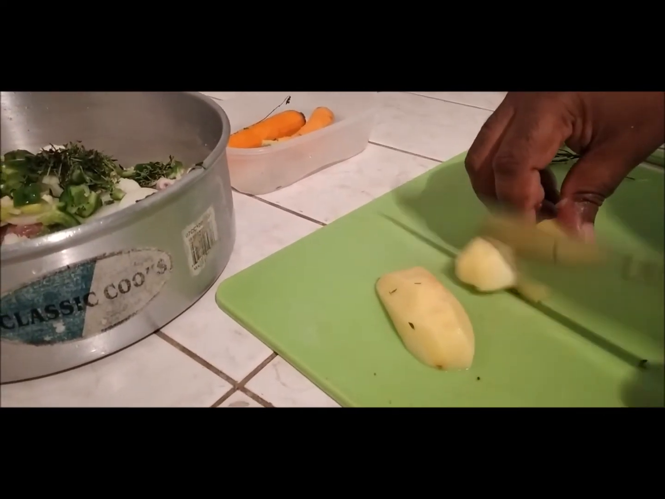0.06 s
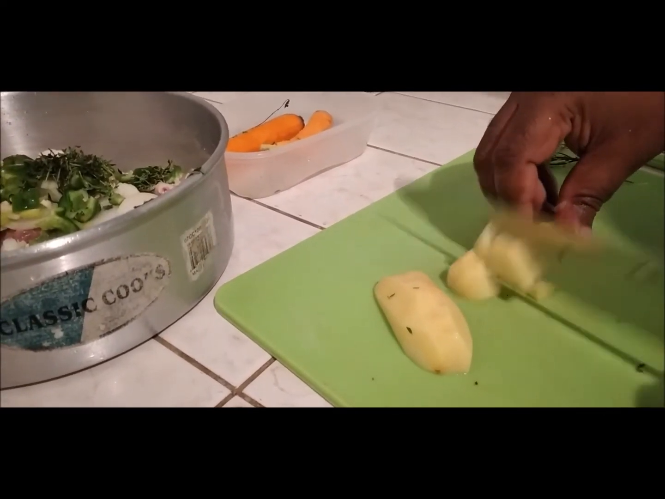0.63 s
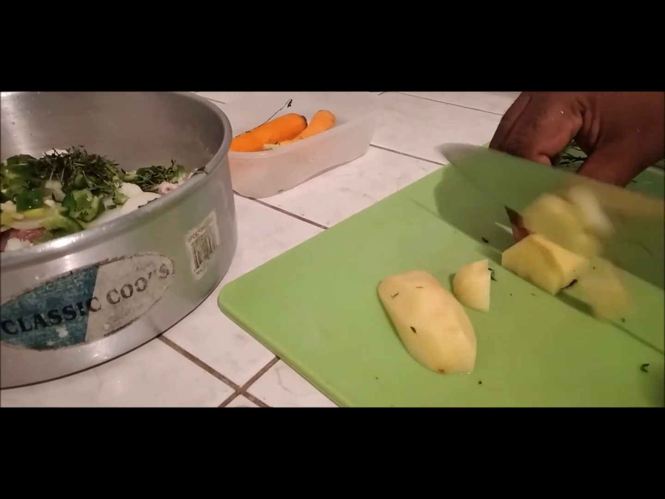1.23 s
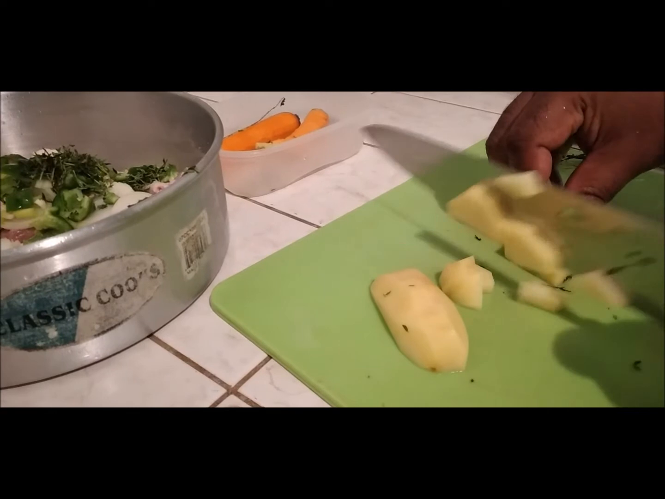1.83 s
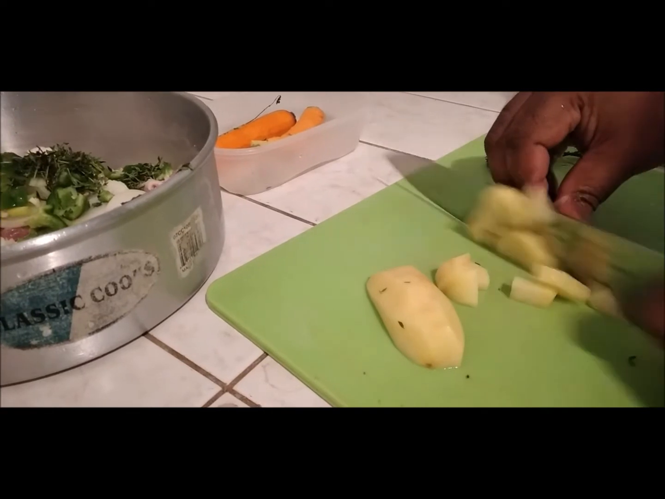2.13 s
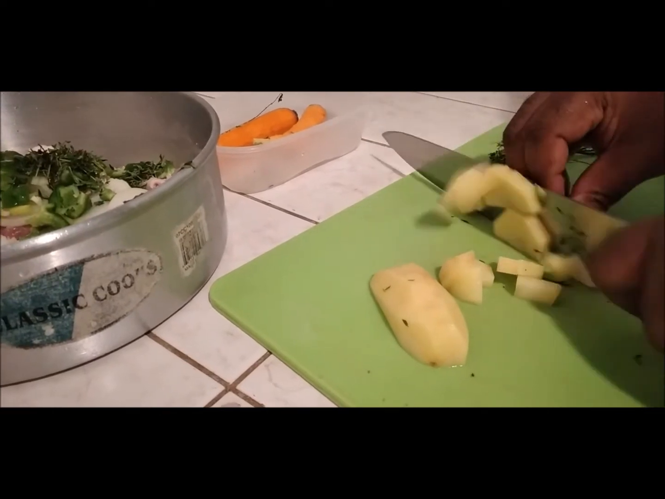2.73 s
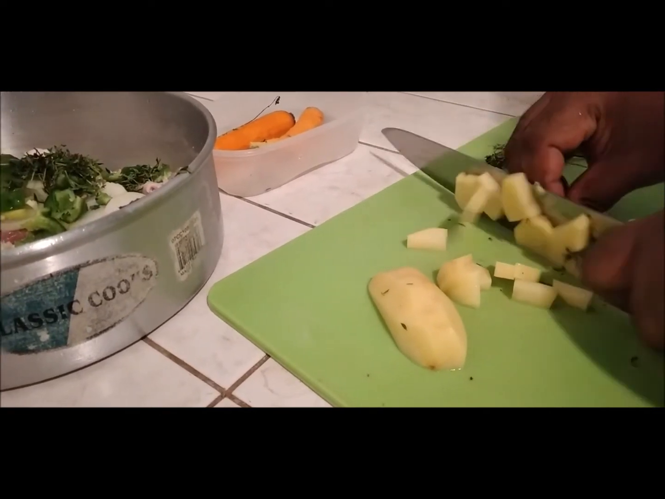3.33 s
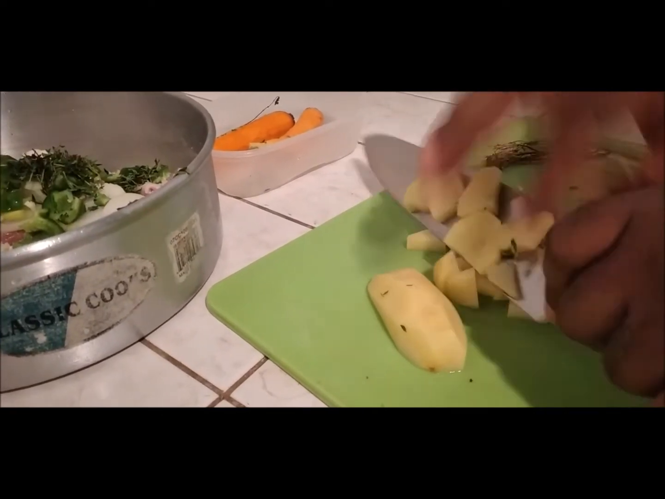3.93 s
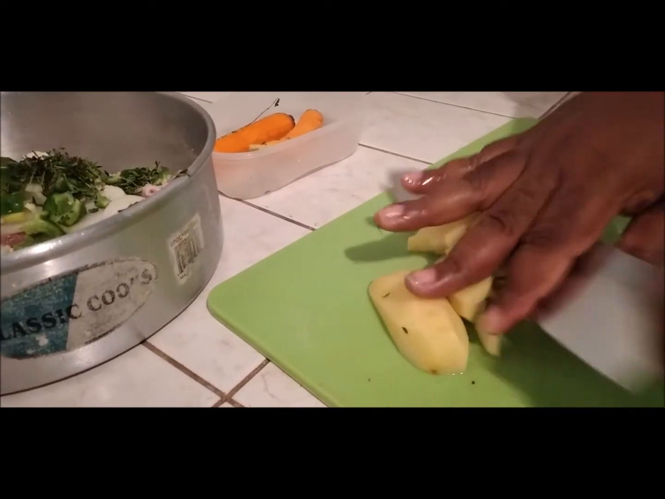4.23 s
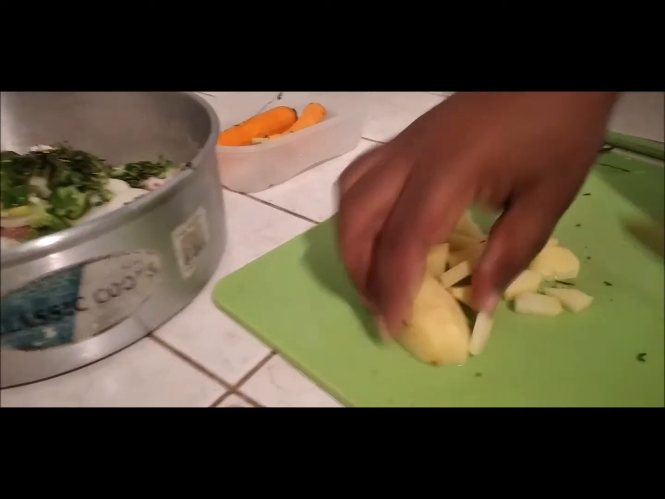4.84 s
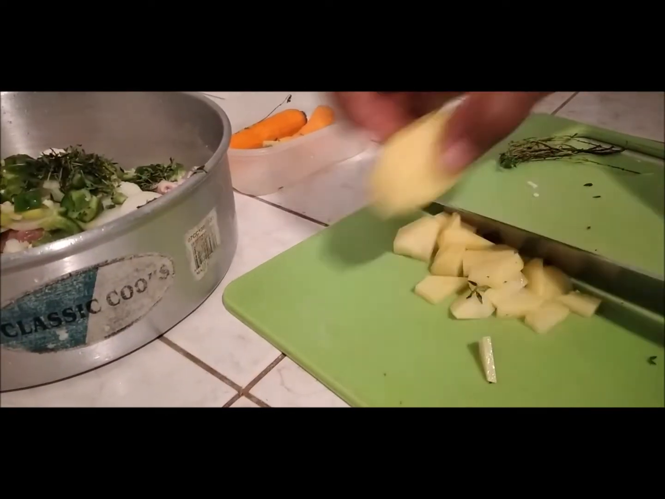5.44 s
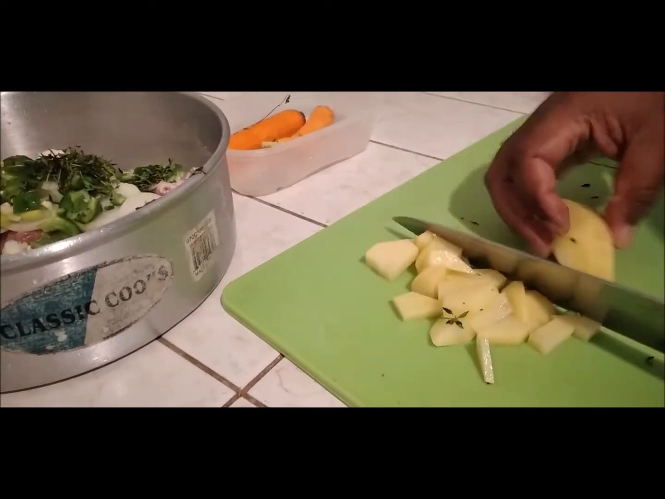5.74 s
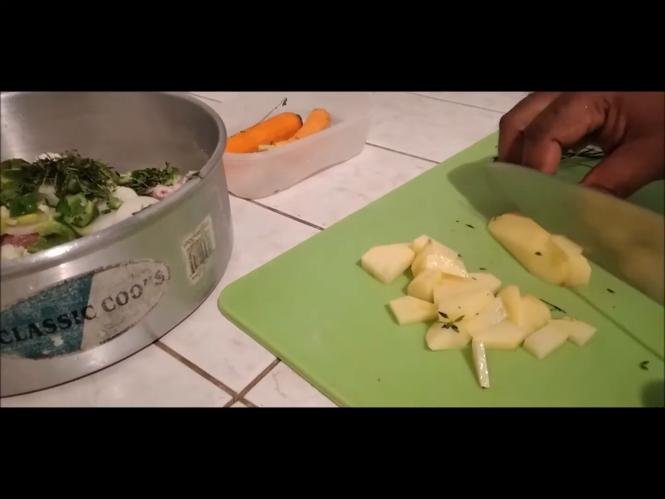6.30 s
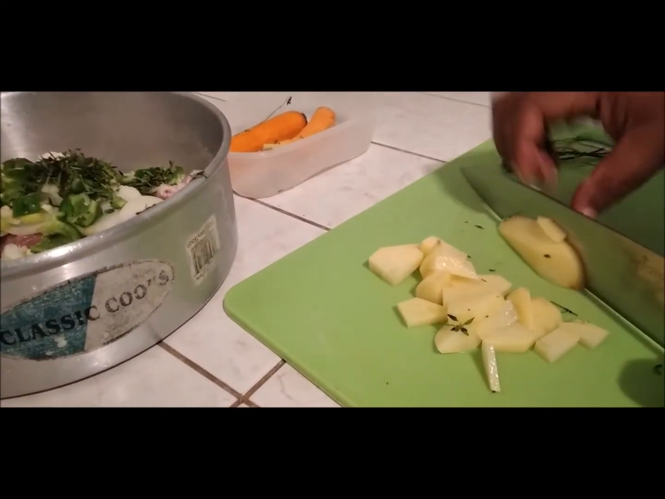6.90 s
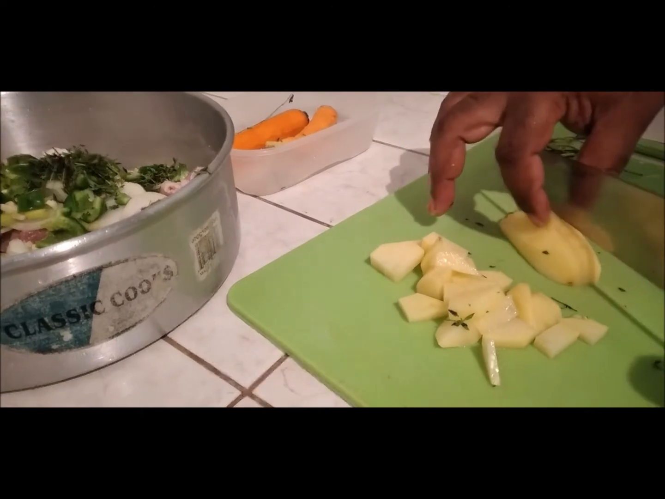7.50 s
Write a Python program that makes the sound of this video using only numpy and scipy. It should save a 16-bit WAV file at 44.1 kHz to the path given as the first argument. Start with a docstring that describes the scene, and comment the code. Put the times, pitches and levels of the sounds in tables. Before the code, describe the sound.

Close by in a small kitchen, a knife crunches through raw potato and knocks on a plastic board seven times at an unhurried pace. A quieter stretch follows, with light taps, tumbling pieces and potato wiped faintly off the blade. A single sharp chop ends the work. Soft room air and a low rumble lie underneath, and a faint distant drone fades early on.

```python
"""A kitchen knife dices a peeled potato on a plastic board on a tiled counter.
Seven strokes come first: each crunches through the flesh, knocks on the board and rings the kitchen.
Light touches fall between them; from 2.1 s a distant drone sinks. After 3.4 s blade and pieces
tap the board and wet potato is wiped off the steel. A last stroke lands at 6.8 s.
Room air and a low rumble run throughout."""
import sys
import numpy as np
from scipy import signal
from scipy.fft import rfft, irfft, next_fast_len
from scipy.io import wavfile

SR = 44100
rng = np.random.default_rng(int(sys.argv[2]) if len(sys.argv) > 2 else 0)


def file_out(sig):
    """Save sig as 16-bit WAV at sys.argv[1]."""
    # one column per channel
    cols = np.atleast_2d(sig).T
    # limit, then scale
    lim = np.clip(cols, -1, 1)
    pcm = np.round(lim * 32767).astype(np.int16)
    wavfile.write(sys.argv[1], SR, pcm)


N = 333396
LEAD = SR // 10   # the first stroke lands just before time zero
TOTAL = N + LEAD
BLOW_S = 0.12

# knife strokes: land_s, level_db, knock_hz, thud_db, clack_db, crack_db, heel_db, cut_s, crunch_db
STROKES = [(-0.024, -11, 933, 2, -7, 0, -16, 0.079, -42),
           (0.4887, -12, 880, 1.5, 0.5, 3.5, -15.5, 0.085, -49.5),
           (0.9831, -9.5, 877, -6, -3.5, -0.5, -18.5, 0.092, -51.5),
           (1.4988, -18.5, 684, 4, 3, 4.5, -8.5, 0.12, -49.5),
           (2.162, -7.5, 1090, 2.5, 3.5, 6.5, -6.5, 0.079, -49),
           (2.6873, -5.5, 1042, -6.5, -2, 3, -18.5, 0.12, -48.5),
           (3.3454, -7, 1023, -2.5, 2.5, -1.5, -14, 0.17, -50),
           (6.7968, -11.5, 1070, 5.5, 1, -1.5, -16, 0.095, -48)]
# board modes, damped by the counter: pitch_hz, level_db, t60_s
BOARD_MODES = [(176, -44.5, 0.035), (275, -29.5, 0.016), (358.4, -31, 0.042), (380, -38, 0.012),
               (475, -24, 0.021), (626, -31, 0.017), (780, -28, 0.084), (894, -20, 0.023),
               (932, -20.5, 0.039), (1160, -21, 0.085), (1226, -26, 0.035), (1324, -15.5, 0.029),
               (1410, -23.5, .018), (1930, -21.5, 0.034), (1806, -21, .012), (2330, -31, 0.015)]
# edge cracking into plastic: freq_hz, density_db
CRACK_SPECTRUM = [(1200, -16), (2400, 3), (3000, 1.5), (4500, -2.5), (6500, -2.5), (7800, 2), (9800, -14.5),
                  (12000, -19), (15500, -47)]
# bursting cells, carried by the board: freq_hz, density_db
CRUNCH_SPECTRUM = [(120, -26.5), (400, -13.5), (620, -9), (850, 1.5), (1100, 1.5), (1400, -3.5),
                   (1700, -10), (2300, -13), (3000, -33), (6000, -51.5)]
# juice: freq_hz, density_db
FIZZ_SPECTRUM = [(1500, -12.5), (3000, 4), (4500, -1.5), (6500, -3), (8300, 4), (10000, -10), (12500, -13),
                 (15500, -29.5)]
# touches of blade, fingers and pieces: start_s, level_db, thud_db, crack_db
LIGHT_TOUCHES = [(0.953, -41.5, 10.5, -36), (1.293, -48, -1, -21), (1.327, -46, 13, 6.5),
                 (1.392, -41, 12, 2), (1.454, -41, -6, -5), (1.482, -33.5, -2, -11),
                 (1.858, -46.5, -7, -20), (2.574, -37.5, 17, 3), (2.867, -35.5, -8, -23),
                 (2.908, -39.5, 9, -29), (3.569, -34.5, -1, 2), (3.737, -43.5, 3, -27),
                 (4.324, -37.5, -3, -29), (4.628, -39.5, 5, -21), (4.962, -44, 16.5, -16),
                 (5.250, -44, 6, 5.5), (5.457, -46.5, 16.5, -29), (5.608, -46, 7, -11),
                 (5.752, -50, 16.5, -14), (5.994, -37, 18, -8.5)]
# pieces being handled: start_s, end_s
HANDLING_SPANS = [(1.95, 2.08), (4.87, 5.02), (5.66, 5.95)]
# wet potato sliding on steel: start_s, end_s, level_db
WIPE_SPANS = [(3.553, 3.57, -50), (5.359, 5.526, -59.5), (5.561, 5.648, -57.5)]
# its swish: freq_hz, density_db
WIPE_SPECTRUM = [(200, 1), (550, -4), (1000, 13), (1600, -0.5), (2400, 4), (3200, -12), (4500, -14.5),
                 (6500, -22.5), (8500, -14), (10000, -28), (13000, -27), (15500, -44)]
# wall reflections: left_delay_s, right_delay_s, level_db
WALL_ECHOES = [(.0046, 0.011, -9), (.0093, 0.014, -15.5), (0.0495, .0515, -24.5)]
# standing waves between the walls: pitch_hz, gain_db
ROOM_MODES = [(116, 4.5), (178.5, 18.5), (268, 3.5), (358, 5.5), (417, 10), (468, 6), (651, 2), (742, 0),
              (823, 3.5), (896, 1), (975, 1), (1128, -3)]
# reverberation time: freq_hz, t60_s
ROOM_DECAY = [(100, 0.65), (260, 0.61), (500, 0.43), (1000, 0.41), (2000, 0.4), (5000, 0.29), (12000, 0.19)]
# reverberation strength: freq_hz, gain_db
ROOM_SPECTRUM = [(60, -2.5), (130, -1.5), (260, -2), (420, 4), (620, -2.5), (950, -3.5), (1500, -2.5),
                 (2300, 0.5), (4000, -4), (8000, -6), (14000, -10.5)]
# likeness of both ears in diffuse sound: freq_hz, correlation
EAR_CORRELATION = [(60, 0.97), (170, 0.76), (330, 0.81), (700, 0.2), (1200, -0.22), (2200, -.05),
                   (8000, 0.9)]
# room air: freq_hz, density_db
AIR_SPECTRUM = [(40, -8.5), (90, -1), (130, -3), (180, -5.5), (250, -4.5), (310, -2.5), (380, -10.5),
                (480, -6), (620, -11.5), (800, -7.5), (1050, -12), (2250, -18), (2750, -27), (3400, -55)]
# low rumble: freq_hz, density_db
RUMBLE_SPECTRUM = [(22, -24.5), (34, -9), (43, 12), (56, 11.5), (64, 0), (74, -18.5), (110, -64.5)]
# distant drone: freq_hz, density_db
DRONE_SPECTRUM = [(80, -23), (115, -4), (220, -5), (268, 7), (295, -2.5), (330, -13.5), (700, -11.5),
                  (1200, -18.5), (2500, -63)]
# microphone port resonances, left then right: centre_hz, width_hz, gain_db
MIC_PORTS = [(6160, 3500, 2), (11800, 3100, 1.5)]


def chops(paths, usual_t60_s=0.009, usual_heel_s=0.005, counter_hz=104, counter_t60_s=0.16):
    """The edge lands tip first, then heel, and the counter booms; each spot stirs the room anew."""
    out = np.zeros((2, TOTAL))
    t = seconds(BLOW_S)
    usual_db, usual_heel_db = np.mean([(row[1], row[6]) for row in STROKES], axis=0)
    for land_s, level_db, knock_hz, thud_db, clack_db, crack_db, heel_db, _, _ in STROKES:
        # a harder blow rings longer; a flatter blade brings the heel harder and sooner
        t60_s = usual_t60_s * from_db(level_db - usual_db) ** 0.22
        heel_s = usual_heel_s / from_db(heel_db - usual_heel_db) ** 0.45
        tip = blow(knock_hz, t60_s, thud_db, clack_db, crack_db, contact_hz=1670, order=2)
        heel = from_db(heel_db) * np.interp(t - heel_s, t, tip, left=0)
        boom_db = -40.5 + 1.1 * thud_db - 60 * t / counter_t60_s
        boom = from_db(boom_db) * np.sin(2 * np.pi * counter_hz * t)
        add(out, land_s, from_db(level_db) * kitchen(tip + heel + boom + squelch(), paths))
    return out


def blow(knock_hz, knock_t60_s, thud_db, clack_db, crack_db, contact_hz, order,
         thud_below_hz=550, clack_above_hz=1250, spread_db=5.5, detune=0.008, crack_t60_s=0.0099):
    """One contact: the struck spot knocks, the board's modes ring, the plastic cracks."""
    t = seconds(BLOW_S)
    body = ring(t, knock_hz, knock_t60_s)
    for hz, db, t60_s in BOARD_MODES:
        strength, shift = rng.standard_normal(2)
        # blade place and angle weight the low and high modes
        weight_db = thud_db * (hz < thud_below_hz) + clack_db * (hz > clack_above_hz)
        body += from_db(db + weight_db + spread_db * strength) * ring(t, hz * (1 + detune * shift), t60_s)
    crack = coloured(rng.standard_normal(len(t)), CRACK_SPECTRUM)
    crack *= from_db(-30 + crack_db - 60 * t / crack_t60_s)
    softness = signal.butter(order, contact_hz, fs=SR, output="sos")   # a longer contact loses its top
    return crack - signal.sosfilt(softness, body)


def slices(bursts_per_s=3000, spread_db=1.5, entry_share=0.43, release_s=0.0044,
           swell_db=4.5, fizz_db=-19.5, juice_swell_db=10):
    """Cells burst under the blade until it lands: a crunch and a wet fizz, both growing with depth."""
    crunch_gain, fizz_gain = np.zeros((2, TOTAL))
    for land_s, *_, cut_s, crunch_db in STROKES:
        t = seconds(cut_s)
        depth = t / t[-1]
        fade = np.clip(np.minimum(depth / entry_share, (t[-1] - t) / release_s + 0.5), 0, 1)
        stroke = fade * from_db(crunch_db + swell_db * (depth - 1))
        add(crunch_gain, land_s - cut_s, stroke)
        add(fizz_gain, land_s - cut_s, stroke * from_db(fizz_db + juice_swell_db * (depth - 0.5)))
    sizes = from_db(spread_db * np.minimum(rng.exponential(1, TOTAL), 4))
    signs = rng.choice([-1, 1], TOTAL)
    bursts = sizes * signs * (rng.random(TOTAL) < bursts_per_s / SR)
    return crunch_gain * coloured(bursts, CRUNCH_SPECTRUM) + fizz_gain * coloured(bursts, FIZZ_SPECTRUM)


def squelch(level_db=-56, t60_s=0.53):
    """Juice hisses briefly as the slice parts from the blade."""
    t = seconds(BLOW_S)
    return coloured(rng.standard_normal(len(t)), FIZZ_SPECTRUM) * from_db(level_db - 60 * t / t60_s)


def touches(usual_contact_hz=1860, settle_s=0.0051, settle_db=-7, pitch_spread=0.029):
    """Soft contacts at changing spots of the board; each lands, then settles."""
    out = np.zeros(TOTAL)
    for start_s, level_db, thud_db, crack_db in LIGHT_TOUCHES + nudges():
        contact_hz = usual_contact_hz * from_db(crack_db) ** 0.13   # harder is shorter and brighter
        for delay_s, gain_db in [(0, 0), (settle_s * rng.uniform(0.46, 1.3), settle_db)]:
            pitch_ratio = np.exp(pitch_spread * rng.standard_normal())
            tap = blow(knock_hz=780 * pitch_ratio, knock_t60_s=0.021, thud_db=thud_db, clack_db=-1.5,
                       crack_db=crack_db, contact_hz=contact_hz, order=4)
            add(out, start_s + delay_s, from_db(level_db + gain_db) * tap)
    return out


def nudges(rate_per_s=29, mean_db=-58, spread_db=2, thud_db=14, crack_db=-6):
    """Handled pieces tumble at uneven moments; rows as in LIGHT_TOUCHES."""
    rows = []
    for start_s, end_s in HANDLING_SPANS:
        for slot_s in np.arange(start_s, end_s, 1 / rate_per_s):
            nudge_s = slot_s + rng.random() / rate_per_s
            rows.append((nudge_s, mean_db + spread_db * rng.standard_normal(), thud_db, crack_db))
    return rows


def wipes():
    """Pieces slide along the wet blade; the swish swells and fades."""
    gain = np.zeros(TOTAL)
    for start_s, end_s, level_db in WIPE_SPANS:
        arch = np.sin(np.linspace(0, np.pi, int((end_s - start_s) * SR)))
        add(gain, start_s, from_db(level_db) * arch)
    return gain * coloured(rng.standard_normal(TOTAL), WIPE_SPECTRUM)


def kitchen(x, paths, scatter_db=-5.5, scatter_t60_s=0.06):
    """Sound arrives by the fixed paths, as early scatter off pot and tiles, and as a diffuse tail."""
    t = seconds(1)
    envelope = from_db(-60 * t / scatter_t60_s) * np.clip((t - 0.002) / 0.001, 0, 1)
    scatter = from_db(scatter_db) * diffuse(len(t)) * envelope / np.linalg.norm(envelope)
    return signal.fftconvolve(x[None], paths + scatter + reverberation(), axes=1)


def fixed_paths(left_db=0.83):
    """Direct sound, earlier and louder on the left, plus wall echoes and standing waves."""
    t = seconds(1)
    response = np.zeros((2, len(t)))
    response[0, 0], response[1, 3] = from_db(left_db), from_db(-left_db)
    for left_s, right_s, db in WALL_ECHOES:
        response[[0, 1], [int(left_s * SR), int(right_s * SR)]] += from_db(db)
    for hz, db in ROOM_MODES:
        t60_s = at_hz(ROOM_DECAY, hz)
        unity_scale = 2 * np.log(1000) / (t60_s * SR)   # gain 1 at resonance
        response += from_db(db) * unity_scale * ring(t, hz, t60_s)
    return response


def reverberation(build_s=0.0044):
    """Diffuse tail of the kitchen; each octave dies at its own rate."""
    t = seconds(1)
    hz = np.arange(len(t) // 2 + 1.0)
    spectrum = rfft(diffuse(len(t))) * from_db(at_hz(ROOM_SPECTRUM, hz))
    octave = np.log2((hz + 1) / 1000)
    build = np.clip(t / build_s, 0, 1)
    tail = np.zeros((2, len(t)))
    for band in range(-4, 5):
        share = np.clip(1 - np.abs(octave - band), 0, 1)
        envelope = build * from_db(-60 * t / at_hz(ROOM_DECAY, 1000 * 2.0 ** band))
        tail += irfft(spectrum * share, len(t)) * envelope / np.linalg.norm(envelope)
    return tail


def background(air_db=-64, rumble_db=-58.5, drone_db=-58.5, hold_s=2.1, sink_db_per_s=8, max_sink_db=19):
    """Room air, a low rumble and a distant drone that holds, then sinks."""
    air, rumble, drone = [coloured(diffuse(next_fast_len(N))[:, :N], spectrum)
                          for spectrum in (AIR_SPECTRUM, RUMBLE_SPECTRUM, DRONE_SPECTRUM)]
    sink_db = np.clip(sink_db_per_s * (np.arange(N) / SR - hold_s), 0, max_sink_db)
    return from_db(air_db) * air + from_db(rumble_db) * rumble + from_db(drone_db - sink_db) * drone


def diffuse(size):
    """White stereo noise from all around; the ears' correlation varies with frequency."""
    mid, side = rfft(rng.standard_normal((2, size)))
    alike = at_hz(EAR_CORRELATION, np.arange(len(mid)) * SR / size)
    return irfft(np.sqrt((1 + alike) / 2) * mid + np.sqrt((1 - alike) / 2) * side * [[1], [-1]], size)


def coloured(x, spectrum):
    """Noise shaped by a spectrum; rms 1."""
    size = next_fast_len(x.shape[-1])
    gain = from_db(at_hz(spectrum, np.arange(size // 2 + 1) * SR / size))
    shaped = irfft(rfft(x, size) * gain, size)[..., :x.shape[-1]]
    return shaped / np.sqrt(np.mean(shaped ** 2) + 1e-20)


def ring(t, hz, t60_s):
    """A struck mode."""
    return np.cos(2 * np.pi * hz * t) * from_db(-60 * t / t60_s)


def add(track, start_s, sound):
    """Mix into a track that begins LEAD samples before time zero."""
    start = max(int(round(start_s * SR)) + LEAD, 0)
    part = sound[..., :TOTAL - start]
    track[..., start:start + part.shape[-1]] += part


def at_hz(points, hz):
    """Read a table on a log-frequency axis."""
    table = np.array(points)
    return np.interp(np.log(np.maximum(hz, 1)), np.log(table[:, 0]), table[:, 1])


def from_db(db):
    """Decibels to gain."""
    return 10 ** (np.asarray(db) / 20)


def seconds(length_s):
    """Time axis."""
    return np.arange(int(length_s * SR)) / SR


def scene():
    """Work on the board, heard in the kitchen over its background."""
    paths = fixed_paths()
    work = chops(paths) + kitchen(touches() + slices() + wipes(), paths)[:, :TOTAL]
    return work[:, LEAD:] + background()


def record(dry, ceiling=0.52, cutoff_hz=15500):
    """Peaks are rounded, each microphone port adds a treble resonance, the top is cut."""
    rounded = dry / (1 + (dry / ceiling) ** 4) ** 0.25
    heard = []
    for channel, (hz, width_hz, db) in zip(rounded, MIC_PORTS):
        resonance = signal.lfilter(*signal.iirpeak(hz, hz / width_hz, fs=SR), channel)
        heard.append(channel + from_db(db) * resonance)
    return signal.sosfilt(signal.ellip(10, 0.1, 80, cutoff_hz, fs=SR, output="sos"), heard)


dry = scene()
out = record(dry)
file_out(out)
```